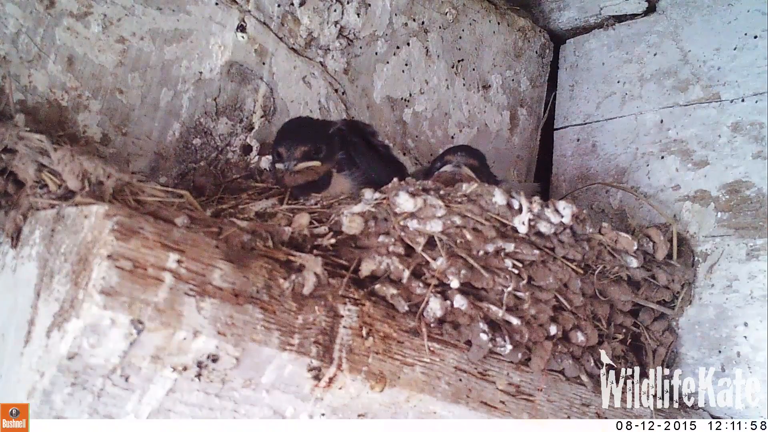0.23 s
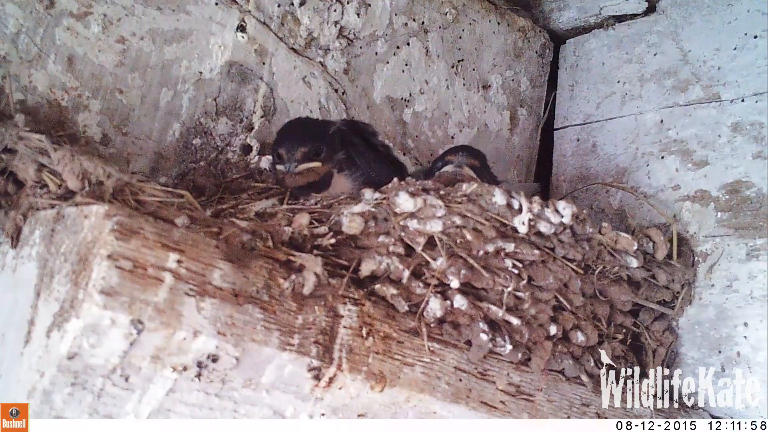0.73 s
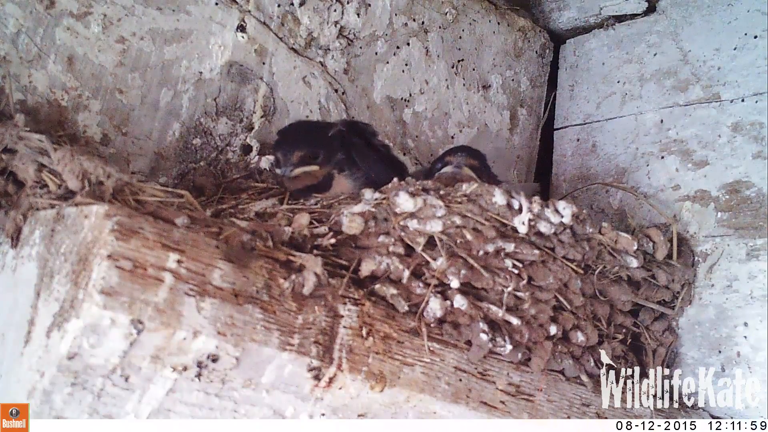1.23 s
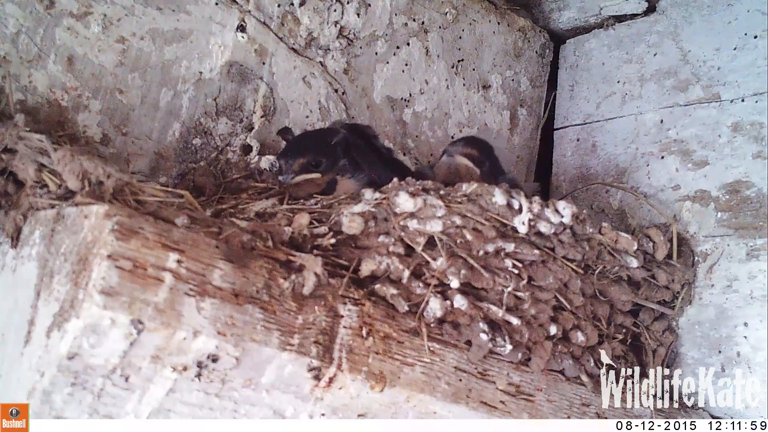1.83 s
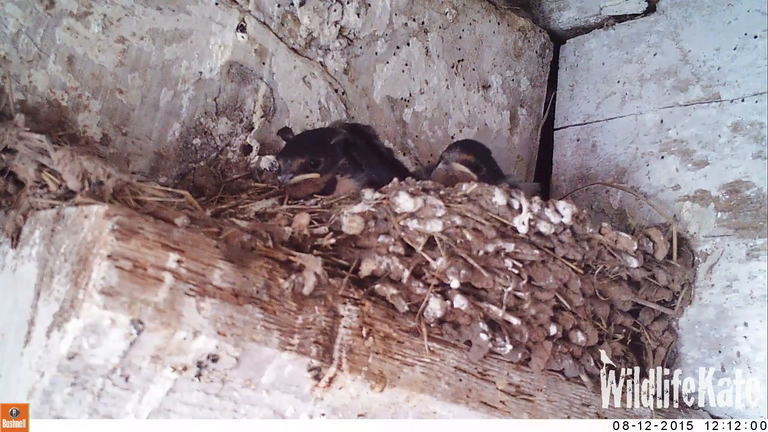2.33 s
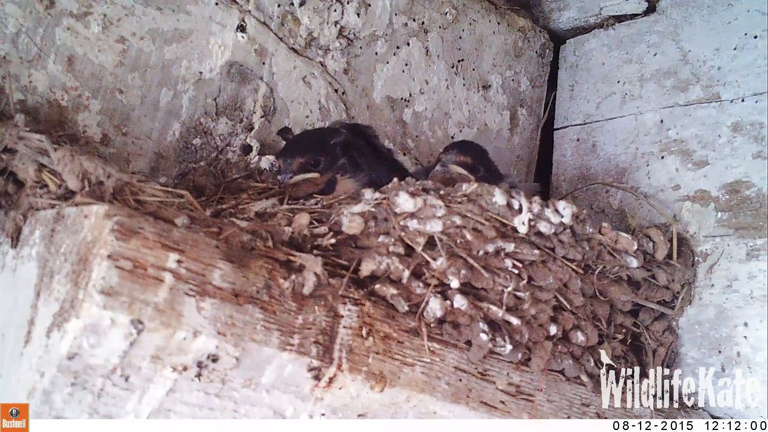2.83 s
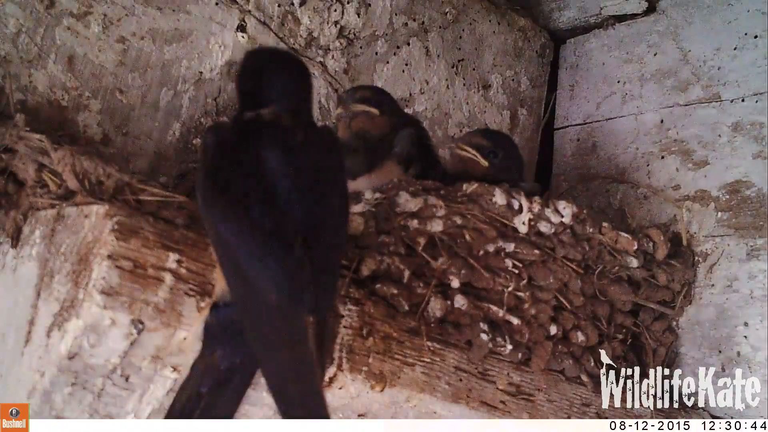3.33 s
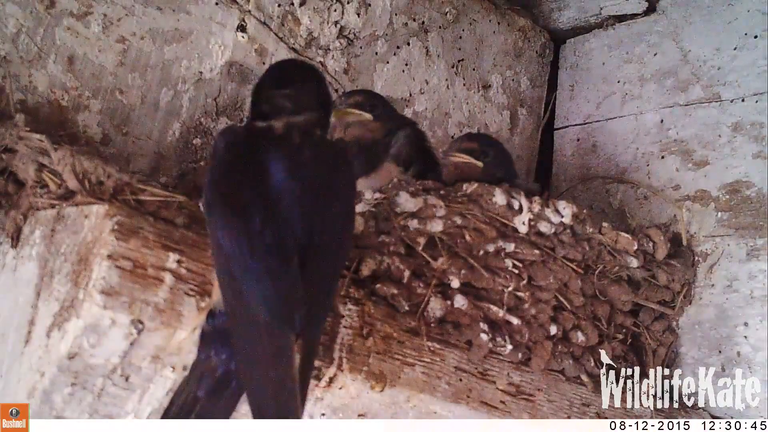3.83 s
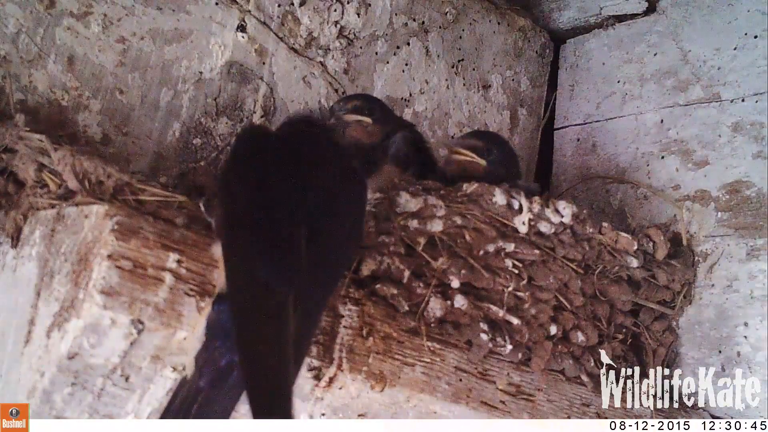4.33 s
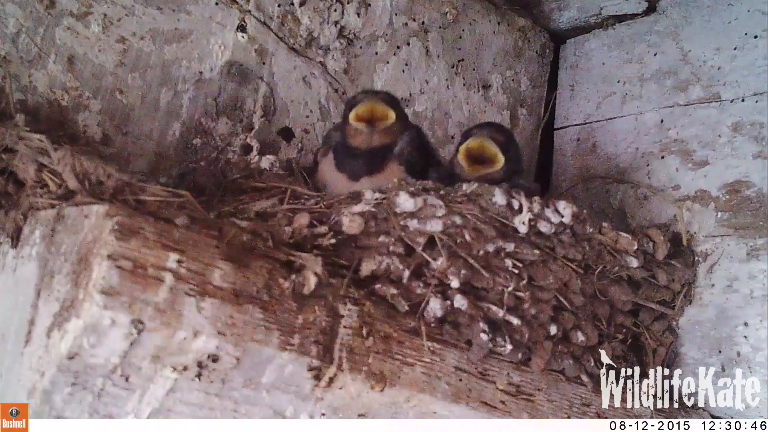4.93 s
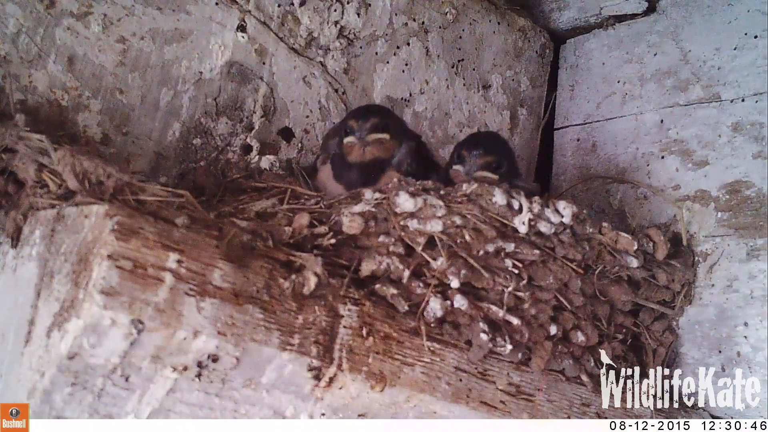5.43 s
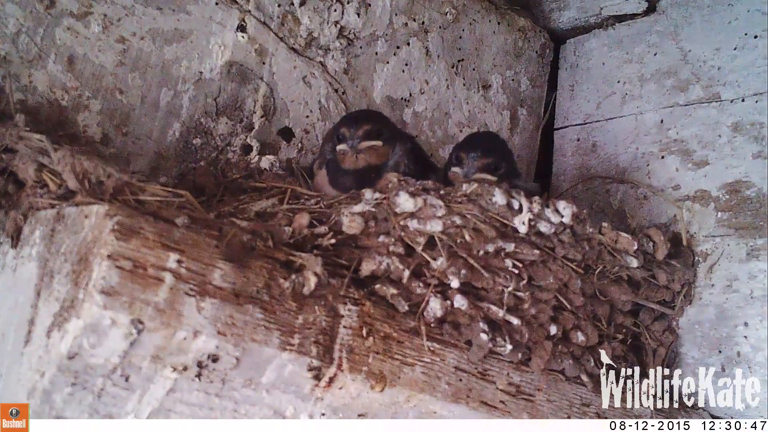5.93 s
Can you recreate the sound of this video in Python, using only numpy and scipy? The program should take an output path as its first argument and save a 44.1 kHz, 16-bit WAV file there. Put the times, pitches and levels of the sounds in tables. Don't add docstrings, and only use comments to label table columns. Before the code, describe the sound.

A small, noisy microphone beside a swallow nest under a garage roof. First, quiet high chirps come from a distance, blurred by echo, over bassy hiss. After an abrupt scene change and a muffled moment, scratchy rapid chick begging bursts out close by, with bright gliding adult chirps among the rasps. Wings flutter and puff air into the microphone as the parent leaves, and the chicks fall silent.

```python
import sys
import numpy as np
from scipy import signal
from scipy.fft import rfft, irfft, next_fast_len
from scipy.io import wavfile
from scipy.ndimage import uniform_filter1d, map_coordinates

SR = 44100
rng = np.random.default_rng(int(sys.argv[2]) if len(sys.argv) > 2 else 0)


def volts(x):
    e = np.asarray(x, float) / 20
    return 10 ** e


def dump(signal):
    limited = np.clip(np.atleast_2d(signal).T, -1, 1)
    pcm = np.round(limited * 32767).astype(np.int16)
    wavfile.write(sys.argv[1], SR, pcm)


N = 273067

# f/Hz, t60/s
CORNER = [(2000, 0.1), (3200, 0.14), (4500, 0.14), (7000, 0.084), (12000, 0.029)]
# f/Hz, t60/s
GARAGE = [(2000, 0.53), (4300, 0.43), (6500, 0.29), (12000, 0.045)]
CUT_S, RESUME_S, FULL_S = 2.9034, 2.94, 3.5204
TOP_HZ = 13950


def unit(x):
    return x / np.sqrt(np.mean(x ** 2) + 1e-20)


def along(points, hz):
    f, value = np.transpose(points)
    return np.interp(np.log(hz + 1), np.log(f + 1), value)


def clock():
    return np.arange(N) / SR


def wobble(rate, count=N):
    knots = rng.standard_normal(int(count * rate / SR) + 4)
    return map_coordinates(knots, [np.arange(count) * rate / SR])


def filtered(x, response):
    size = next_fast_len(N + SR // 2)
    return irfft(rfft(x, size) * response(np.fft.rfftfreq(size, 1 / SR)), size)[:N]


def modes(table):
    def response(f):
        total = 0
        for k, (centre, width, db) in enumerate(table):
            one = 1j * f * width / (centre * centre - f * f + 1j * f * width)
            total = total + (-1) ** k * volts(db) * one ** 2
        return total
    return response


def phrase(rows, edge):
    s, *columns = np.transpose(rows)
    n = np.arange(round(s[0] * SR), round(s[-1] * SR))
    t = n / SR
    gate = np.clip(np.minimum(t - s[0], s[-1] - t) / edge, 0, 1)
    return n, gate, [np.interp(t, s, column) for column in columns]


def room(x, decay):
    out, step = np.zeros(N + 2 * SR), SR // 4
    for start in range(0, N, step):
        piece = x[start:start + step]
        if np.abs(piece).max() < 1e-6:
            continue
        hz, t, z = signal.stft(rng.standard_normal(SR * 3 // 4), SR, nperseg=128)
        fade = volts(-60 * t / along(decay, hz)[:, None])
        tail = signal.istft(z * fade, SR, nperseg=128)[1]
        wet = signal.fftconvolve(piece, tail / np.linalg.norm(tail))
        out[start:start + len(wet)] += wet
    return out[:N]


def preamp():
    # f/Hz, density/dB per Hz
    hiss_curve = [(4.7, -8), (8.0, 0.5), (27, -5), (113, -13), (254, -22.5), (369, -26), (418, -28.5),
                  (459, -28.5), (589, -32.5), (2320, -46.5), (3700, -47.5), (4600, -50.5), (13700, -55.5)]
    # multiple, level/dB
    buzz = [(2, -55.5), (3, -82.5), (4, -74), (6, -71.5), (8, -78.5)]
    throb_hz, beat_s, still_s = 17.6, 0.987, 0.34
    t = clock()
    hiss = unit(filtered(rng.standard_normal(N), lambda f: volts(along(hiss_curve, f)) * (f > 4)))
    beat = np.sin(np.pi * (t - still_s) / beat_s)
    level = volts(-42 - 6 * (t > CUT_S))
    throb = level * beat * np.sin(2 * np.pi * throb_hz * t)
    for k, db in buzz:
        throb += volts(db) * np.sin(2 * np.pi * k * throb_hz * t)
    return volts(-50.5) * hiss + throb * ((t < CUT_S) | (t > FULL_S))


def flock():
    leaves_s, fade_db_per_s = 5.25, 7
    band = unit(filtered(rng.standard_normal(N), modes([(4200, 1300, 0)])))
    faded_db = fade_db_per_s * np.maximum(clock() - leaves_s, 0)
    return band * volts(-71.5 - faded_db + 0.5 * wobble(10))


def far_chirps():
    # t/s, length/s, start f/Hz, end f/Hz, level/dB
    chirps = [(0.149, 0.057, 3870, 3790, -70.5), (0.184, 0.042, 3700, 3146, -63),
              (0.222, 0.12, 4280, 3870, -62.5), (0.363, 0.06, 3790, 4200, -63),
              (0.61, 0.11, 4380, 4440, -67.5), (0.624, 0.067, 3430, 2954, -68.5),
              (0.678, 0.048, 4610, 3716, -59), (0.937, .06, 4090, 2900, -69.5),
              (1.009, 0.091, 4200, 3805, -69), (1.079, .1, 3940, 3830, -74),
              (1.136, 0.037, 2600, 3000, -79), (1.15, 0.053, 4370, 4000, -70),
              (1.392, 0.027, 3790, 3900, -77), (1.434, 0.043, 4050, 4200, -78),
              (1.435, 0.025, 2900, 3050, -77), (1.644, 0.03, 4630, 4450, -67),
              (1.648, 0.022, 3630, 3650, -71.5), (1.688, 0.036, 4600, 3820, -63),
              (1.959, 0.085, 3880, 4200, -74.5), (2.016, 0.026, 3680, 3110, -67),
              (2.024, 0.031, 4520, 4630, -72), (2.488, 0.041, 4470, 3590, -67.5),
              (2.534, 0.029, 4670, 3540, -60), (2.857, .04, 4670, 3450, -66)]
    # f/Hz, width/Hz, level/dB
    rafters = [(2700, 2600, -5.5), (3650, 1270, 0.5), (4460, 800, 0.5), (5600, 2900, -9)]
    out = np.zeros(N)
    rasp = unit(filtered(rng.standard_normal(N), modes([(4200, 11000, 0)])))
    for s, length, start_hz, end_hz, db in chirps:
        hoarse_hz = 270 * volts(0.55 * (db + 66))
        count, start = round(length * SR), round(s * SR)
        pitch = np.linspace(start_hz, end_hz, count) + hoarse_hz * wobble(500.8, count=count)
        voice = np.sin(2 * np.pi * np.cumsum(pitch) / SR)
        voice += hoarse_hz / 700 * rasp[start:start + count]
        swell = np.hanning(count) ** 0.7
        out[start:start + count] += volts(db + 5) * swell * voice
    out = filtered(out, modes(rafters))
    return volts(-11) * out + volts(-4.0) * room(out, CORNER) + volts(-4.0) * room(out, GARAGE)


def wings():
    # t/s, air push/dB, sign and share of the push, width/s, feather swish/dB
    strokes = [
        (5.016, -22.5, -0.71, 0.0044, -73.5),
        (5.039, -44.5, 1, 0.0072, -64.5),
        (5.066, -17, 0.17, 0.013, -64.5),
        (5.092, -22.5, -0.66, 0.0058, -69),
        (5.141, -30.5, 0.91, 0.0028, -67),
        (5.176, -45, 0.23, 0.011, -71.5),
        (5.215, -36.5, -0.64, 0.0078, -74.5),
        (5.25, -59, 0.64, .007, -77.5),
    ]
    push, swish, t = np.zeros(N), np.zeros(N), clock()
    feathers = unit(filtered(rng.standard_normal(N), modes([(5280, 29000, 0)])))
    for s, push_db, sign, width, swish_db in strokes:
        push += sign * volts(push_db) * np.exp(-0.5 * ((t - s) / width) ** 2)
        swish += volts(swish_db) * np.exp(-0.5 * ((t - s) / 0.006) ** 2) * feathers
    vent = lambda f: 1j * f / (6 + 1j * f)
    return filtered(push, vent) + swish + volts(5.5) * room(swish, CORNER)


def parent():
    # t/s, second partial f/Hz, level/dB
    calls = [
        [(3.876, 5460, -43), (3.887, 5060, -40.5), (3.905, 5410, -43), (3.919, 5700, -36), (3.927, 6100, -36),
         (3.936, 6470, -57)],
        [(4.005, 5500, -39), (4.013, 5600, -39), (4.021, 5700, -34)],
        [(4.026, 5900, -32), (4.033, 5840, -38), (4.045, 5970, -45.5), (4.06, 6410, -55), (4.068, 6340, -52)],
        [(4.535, 6420, -51), (4.543, 5910, -44.5), (4.554, 5690, -40), (4.561, 5730, -50)],
        [(4.563, 6340, -48.5), (4.575, 5830, -40.5), (4.587, 5980, -39.5), (4.599, 6290, -42),
         (4.606, 6780, -50)],
        [(4.686, 5600, -35), (4.699, 5710, -34.5), (4.704, 5900, -34.5), (4.721, 5865, -37), (4.73, 6500, -48)],
    ]
    # first partial/dB, undertones/dB, stuttered start/s
    tones = [
        (-54.5, -20, 0.0011),
        (-55, -38, 0.0013),
        (-49, -42, 0),
        (-50.5, -15, 0.011),
        (-48, -16.5, 0.0027),
        (-51, -34, 0.00066),
    ]
    # multiple of the first, level above the second/dB
    partials = [(3, -22.5), (4, -47)]
    first_db_per_khz, stutter_hz = 13, 190
    out = np.zeros(N)
    air = unit(filtered(rng.standard_normal(N), modes([(5500, 9900, -1), (7900, 2800, 13)])))
    for rows, (first_db, under_db, stutter_s) in zip(calls, tones):
        n, gate, (hz, db) = phrase(rows, edge=0.0037)
        count = len(n)
        hz = uniform_filter1d(hz, size=SR // 200, mode="nearest")
        t = (n - n[0]) / SR
        gate = gate * np.where(t < stutter_s, np.sin(np.pi * stutter_hz * t) ** 2, 1)
        turn = np.pi * np.cumsum(hz + 28 * wobble(270, count=count)) / SR
        tone = np.sin(2 * turn)
        for k, level in partials:
            tone += volts(level) * np.sin(k * turn)
        thirds = turn / 3 + 0.4 * wobble(300, count=count)
        under = np.sin(4 * thirds) + volts(-6) * np.sin(8 * thirds) + volts(-8) * air[n]
        first = volts(first_db + first_db_per_khz * (hz - hz.mean()) / 1000) * np.sin(turn)
        quaver = volts(2.5 + wobble(160, count=count))
        out[n] += gate * quaver * (first + volts(db) * (tone + volts(under_db) * under))
    return out


def peeps():
    # t/s, f/Hz, level/dB
    closing = [
        (3.33, 4780, -32),
        (3.765, 4710, -33.5),
        (3.995, 4790, -29),
        (4.195, 5070, -36),
        (4.828, 5270, -43),
        (4.986, 5150, -51),
    ]
    out, t = np.zeros(N), np.arange(SR // 10) / SR
    fade = volts(-60 * t / 0.095)
    onset = 1 - np.exp(-t / 0.00098)
    for s, hz, db in closing:
        turn = 2 * np.pi * np.cumsum(hz + 70 * wobble(200, count=len(t))) / SR
        out[round(s * SR):][:len(t)] += volts(db) * fade * onset * np.sin(turn)
    return out


def chicks():
    # t/s, length/s, peak/dB, brightness/dB, final brightness/dB
    rasps = [
        (2.742, 0.15, -29, -8, 0),
        (2.974, 0.14, -30.5, -14.5, -4),
        (3.205, 0.13, -31, -13, -10.5),
        (3.442, 0.14, -30, -13.5, -5.5),
        (3.644, 0.13, -29, -13, -13.5),
        (3.884, 0.12, -29, -21, -8),
        (4.079, 0.13, -28, -13.5, 1),
        (4.281, 0.12, -29.5, -15, -17.5),
        (4.725, 0.11, -28, -25, 3.5),
        (4.882, .114, -28.5, -10.5, -1.5),
    ]
    # f/Hz, width/Hz, level/dB
    throat_modes = [(2020, 810, -18.5), (2550, 370, -10.5), (3354, 970, -7.5), (3943, 546, 7),
                    (4996, 790, 2), (5600, 1030, -12.5)]
    # f/Hz, width/Hz, level/dB
    beak_modes = [(6817, 400, -0.5), (8240, 520, -7), (10160, 770, -20.5), (13100, 650, -34),
                  (14200, 320, -46)]
    # f/Hz, width/Hz, level/dB
    breath = [(9000, 2600, -24)]
    swell_db_per_s, catch_db, catch_s, spent_db, spent_s = 72, 9, 0.003, 9, 0.004
    gape_s, flash_db, flash_s = 0.03, 6.5, 0.006
    startled, startled_swell = 8, 2.17
    stretch, gape_stretch = 0.018, 1.7

    low, high = np.zeros(N), np.zeros(N)
    for k, (s, length, peak_db, bright_db, final_db) in enumerate(rasps):
        n, gate, (t,) = phrase([(s, 0), (s + length, length)], edge=0.0013)
        left = length - t
        swell = swell_db_per_s * (startled_swell if k == startled else 1)
        db = peak_db - swell * np.maximum(left - spent_s, 0)
        db -= catch_db * np.exp(-t / catch_s)
        db -= spent_db * np.maximum(1 - left / spent_s, 0)
        level = gate * volts(db)
        gape_db = (final_db - bright_db) * np.exp(-left / gape_s)
        low[n] += level
        high[n] += level * volts(bright_db + gape_db + flash_db * np.exp(-t / flash_s))

    slaps = (rng.random(N) < 1100 / SR) * volts(2.5 * rng.standard_normal(N))
    drive = unit(slaps - slaps.mean()) + 1.1 * rng.standard_normal(N)
    drive *= volts(1.7 * wobble(220) + 0.6 * wobble(50))
    throat, beak = modes(throat_modes), modes(beak_modes)

    def loudness(response):
        gain = np.abs(response(np.linspace(1, SR / 2, 4096)))
        return np.std(drive) * np.sqrt(np.mean(gain ** 2))

    throat_rms, beak_rms = loudness(throat), loudness(beak)
    neck = np.pi / 4 * (1 + np.tanh(wobble(9)))
    short = (np.cos(neck), 1 - stretch, drive)
    long = (np.sin(neck), 1 + stretch, np.roll(drive, SR))
    voice = np.zeros(N)
    for share, shift, source in (short, long):
        voice += filtered(share * low * source, lambda f: throat(f * shift)) / throat_rms
        voice += filtered(share * high * source, lambda f: beak(f * shift ** gape_stretch)) / beak_rms
    voice += filtered(high * np.roll(drive, -SR), modes(breath)) / beak_rms
    return filtered(voice, lambda f: 1 / (1 + (1850 / (f + 1)) ** 6))


def scene():
    near = chicks() + peeps() + parent()
    corner = volts(-13) * room(np.roll(near, 90), CORNER)
    garage = volts(-23.0) * room(np.roll(near, 400), GARAGE)
    visit = near + corner + garage + wings() + flock()
    return (np.where(clock() < CUT_S, far_chirps(), visit) + preamp())[None]


def thin_treble(x):
    # f/Hz, depth/dB
    valley = [(5500, 12), (7500, 5.5), (10500, 2.7), (14000, 2.5)]
    hz, _, z = signal.stft(x, SR, nperseg=1024)
    near = uniform_filter1d(uniform_filter1d(np.abs(z) ** 2, size=5, axis=0), size=3, axis=1)
    near_db = 10 * np.log10(np.abs(near) + 1e-20)
    below = hz < TOP_HZ - 200
    around_db = near_db.copy()
    around_db[below] = uniform_filter1d(near_db[below], size=45, axis=0)
    stands_out = near_db > around_db - along(valley, hz)[:, None]
    kept = stands_out | (hz < valley[0][0])[:, None]
    return signal.istft(z * kept, SR, nperseg=1024)[1][:N]


def band_limit(x):
    return signal.sosfilt(signal.butter(12, 14530, fs=SR, output="sos"), x)


def record(dry):
    headroom = 0.17
    t = clock()
    rounded = dry[0] / (1 + np.abs(dry[0] / headroom) ** 3) ** (1 / 3)
    thinned = thin_treble(filtered(rounded, lambda f: f < TOP_HZ))
    hushed = volts(-23) * np.clip((t - RESUME_S) / 0.0035, 0, 1)
    opened = np.clip((t - FULL_S) / 0.0003 + 0.5, 0, 1)
    gain = np.where(t < CUT_S, 1, hushed + (1 - hushed) * opened)
    jolt = volts(-30.5) * (t > FULL_S) * np.exp(-np.abs(t - FULL_S) / 0.000093)
    mix = thinned[None] * gain + jolt
    return band_limit(mix)


dry = scene()
out = record(dry)
dump(out)
```